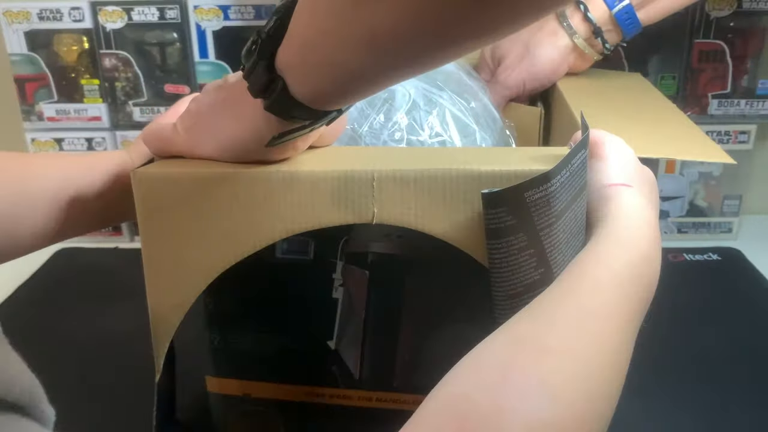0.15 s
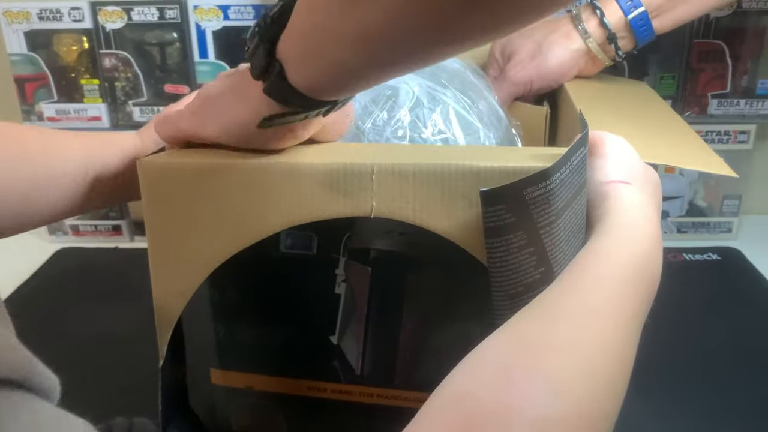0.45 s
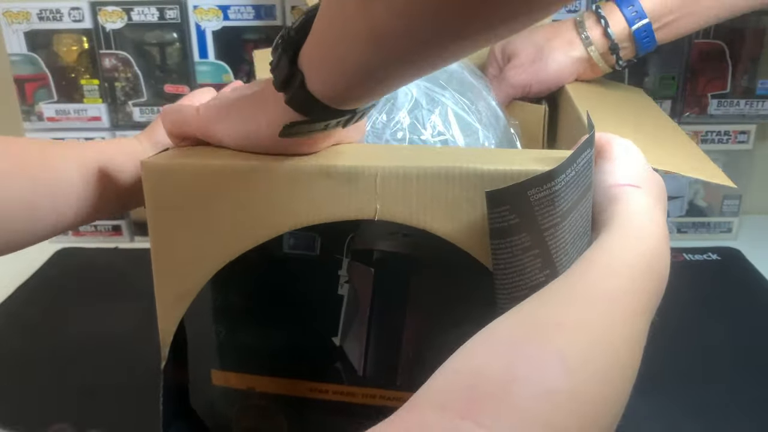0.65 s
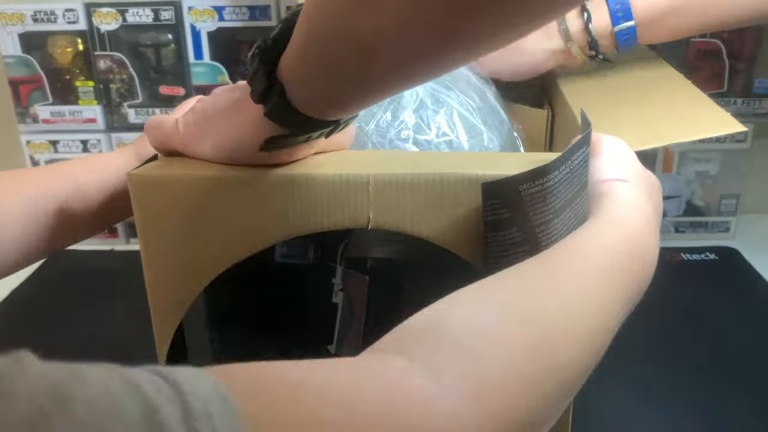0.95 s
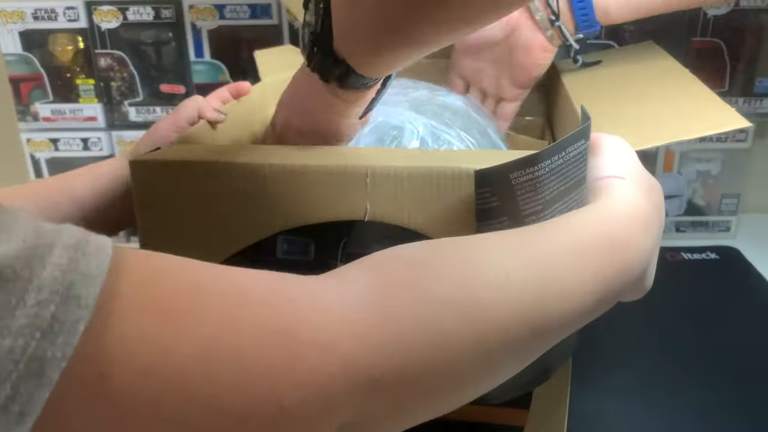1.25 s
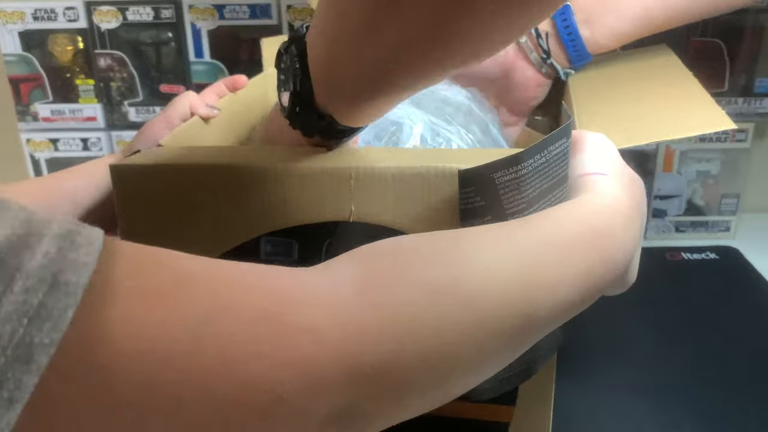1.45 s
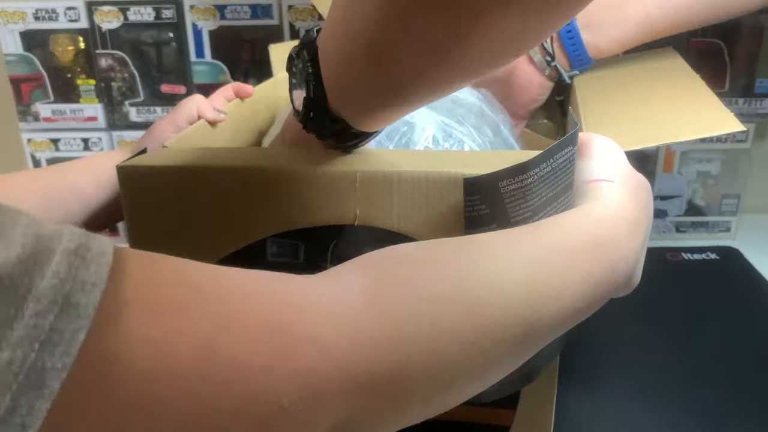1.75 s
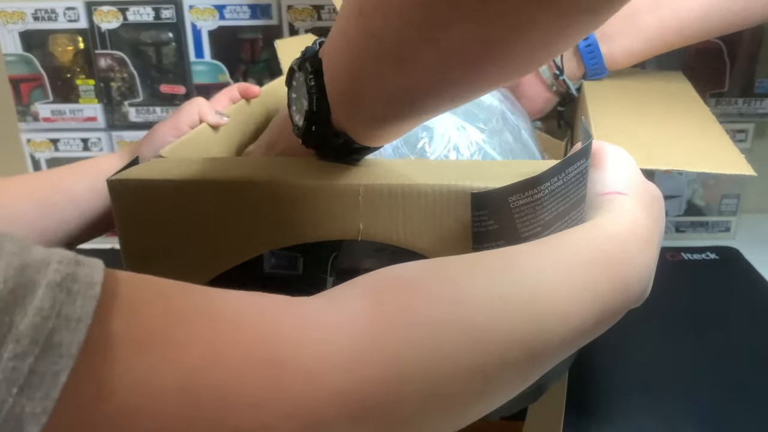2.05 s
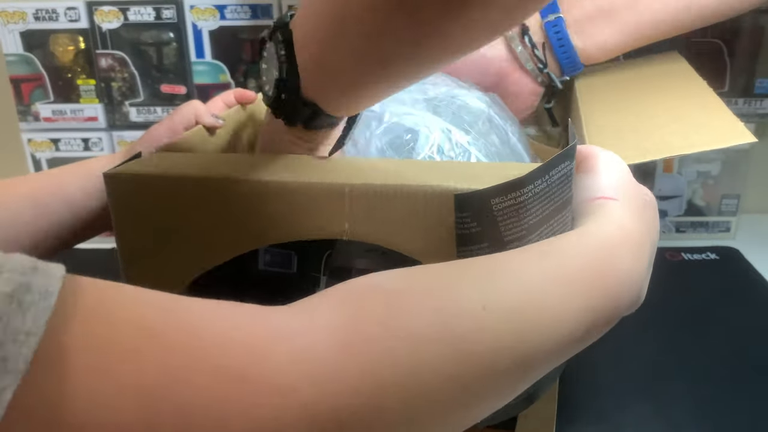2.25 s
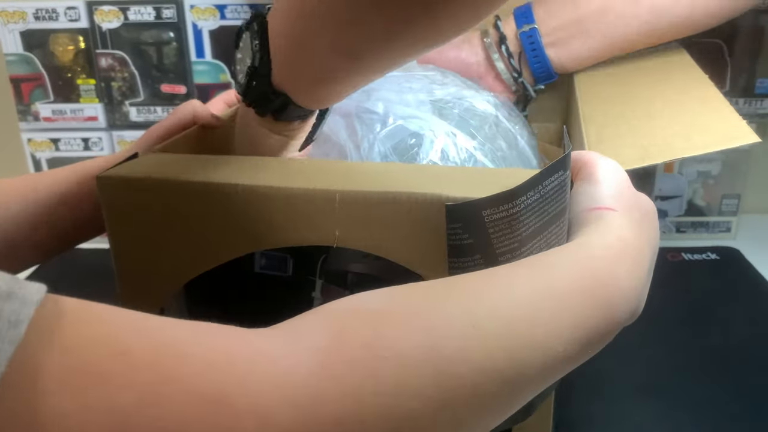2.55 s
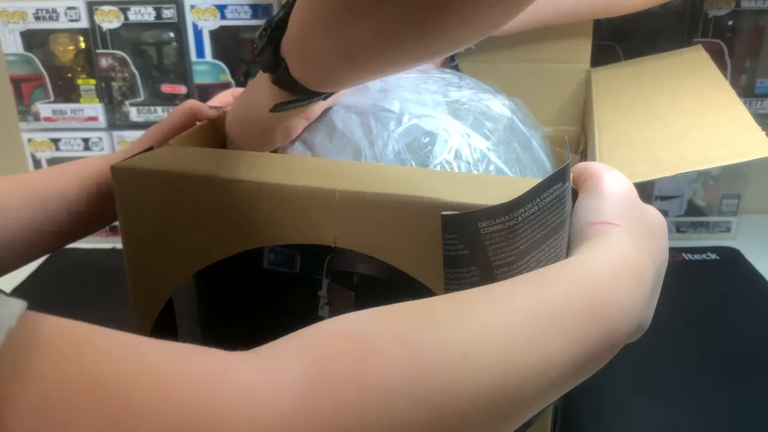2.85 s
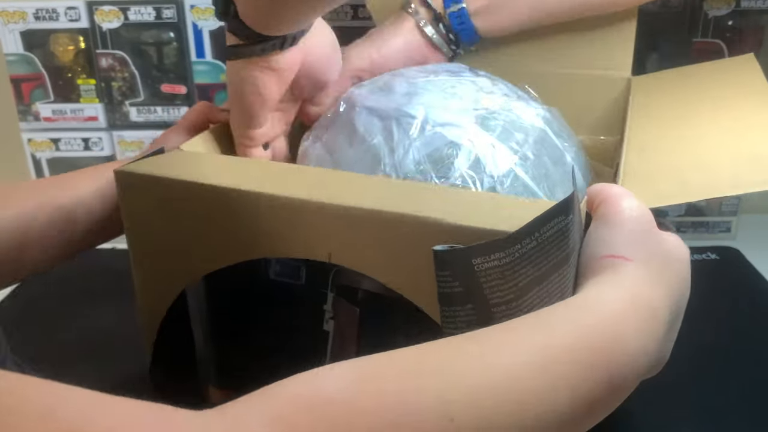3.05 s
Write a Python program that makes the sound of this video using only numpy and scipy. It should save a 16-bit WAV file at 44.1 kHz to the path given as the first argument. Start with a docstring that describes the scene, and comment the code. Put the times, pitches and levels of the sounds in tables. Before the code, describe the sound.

Cardboard box handling, close in a small, dry room. Uneven card rubbing and plastic crinkle run throughout, with a modest snap near 0.67 s and soft taps around 0.9. A hollow flap thump lands at 1.2 s, then a short scrape and tiny squeak near 1.3-1.4. Loud, distorting snaps crowd 1.56-2.11; finger taps follow, weaker snaps from 2.53, another scrape at 2.74, and crinkling to the end.

```python
"""Close to the microphone in a small room, hands work a plastic-wrapped object loose inside a cardboard box.
Card rubs and wrap crinkles throughout (random slips and creases); fingers tap and stiff card snaps.
At 1.2 s a big flap thumps (damped modes); then an edge scrapes (drifting resonance) and card squeaks (a tone).
Snaps (crack, box ring, scatter) crowd in from 1.56 to 2.11 s and return from 2.53 s, with a second scrape.
The loudest snaps overload the microphone."""
import sys
import numpy as np
from scipy import signal
from scipy.fft import rfft, irfft
from scipy.io import wavfile
from scipy.ndimage import uniform_filter1d

SR = 44100
rng = np.random.default_rng(int(sys.argv[2]) if len(sys.argv) > 2 else 0)


def to_wav(sig):
    """Store sig (one row per channel, or 1-D mono) as 16-bit WAV at the path in sys.argv[1].

    Samples outside -1..1 are clipped; the rate is SR.
    """
    pcm = np.clip(np.atleast_2d(sig), -1, 1) * 32767
    pcm = np.round(pcm).astype(np.int16)
    wavfile.write(sys.argv[1], SR, pcm.T)  # frames by channels


N = 141120
T = np.arange(N) / SR
HIT_T = T[:8192]  # time within one blow [s]

# Small room: (level in the middle [dB], level in the side [dB]), then decay times by 60 dB [s]
ROOM_DB, ROOM_SIDE_DB = -20, -23.5
ROOM_T60_S, ROOM_TREBLE_T60_S = 0.19, 0.18

# Sliding, levels before the trims below:
# (time [s], flexing wall level [dB], rubbing level [dB], crinkling level [dB])
SLIDE_LEVELS = [(0, -44, -37, -41), (0.11, -52, -44, -42), (0.21, -52, -50, -54), (0.31, -54, -52, -53),
                (0.38, -54, -47, -53), (0.43, -57, -56, -62), (0.54, -52, -42, -45), (0.63, -38, -43, -43),
                (0.70, -34, -34, -41), (0.79, -57, -46, -46), (0.95, -52, -44, -44), (1.01, -48, -33, -40),
                (1.1, -45, -39, -45), (1.15, -58, -52, -58), (1.19, -41, -37, -43), (1.33, -31, -30, -40),
                (1.41, -43, -38, -43), (1.5, -43, -36, -41), (1.655, -57, -48, -51), (1.69, -42, -35, -41),
                (1.97, -46, -44, -48), (2.18, -50, -40, -44), (2.35, -45, -38, -40), (2.55, -44, -38, -40),
                (2.66, -44, -47, -45), (2.72, -41, -31, -39), (2.78, -31, -27, -35), (2.85, -43, -37, -42),
                (2.91, -46, -39, -37), (3.08, -43, -35, -39), (3.2, -46, -36, -33)]
FLEX_TRIM_DB, RUB_TRIM_DB, WRAP_TRIM_DB = -0.5, 1, 2.5
# Spectrum of the flexing walls: (frequency [Hz], relative level [dB])
FLEX_SPECTRUM = [(100, -13), (170, -2), (280, -0.5), (450, -0.5), (700, -12), (2000, -53)]
# Spectrum of the rubbing card: (frequency [Hz], relative level [dB])
RUB_SPECTRUM = [(120, -37), (350, -13.5), (600, 2), (850, 1), (1300, -4), (1800, -0.5), (2800, -12),
                (16000, -44)]
# Spectrum of the crinkling wrap: (frequency [Hz], relative level [dB])
WRAP_SPECTRUM = [(300, -54), (1500, 1.5), (3000, 1.5), (6500, -1.5), (10000, -4), (16000, -8)]
RUB_PER_S, RUB_SPREAD_DB = 1400, 2.6
RUB_FLICKER_DB, RUB_FLICKER_HZ = 2.5, 43.8  # the sliding catches and lets go
# The moving contact drives now one mode, now another
RUB_RING_DB, RUB_SHIFT_DB, RUB_SHIFT_HZ = -11, 4.5, 18

# Sizes of crease in the wrap: (lowest frequency [Hz], highest frequency [Hz])
CREASE_BANDS = [(300, 2500), (2500, 4500), (4500, 7500), (7500, 11000), (11000, 17000)]
CRINKLE_PER_S, CRINKLE_SPREAD_DB = 380, 4.48
CRINKLE_DECAY_S, CRINKLE_BED = 0.0032, 0.17  # decay of the power; steady power underneath

# Ticks of the wrap: (time [s], decay [s], level [dB], frequency that places the band [Hz])
WRAP_TICKS = [(0.048, .003, -44, 6400), (0.228, 0.028, -42.5, 4500), (0.606, 0.004, -39.5, 7150),
              (0.9007, 0.001, -35, 1980), (1.0795, 0.00064, -26, 7900), (1.112, 0.0033, -36, 1670),
              (1.284, 0.0086, -37.5, 9000), (1.442, 0.012, -32, 6800), (1.537, 0.0013, -35, 3000),
              (1.771, 0.0025, -36, 2980), (1.993, 0.0069, -32, 1780), (2.1, 0.0095, -30, 2940),
              (2.389, 0.0049, -34.5, 1900), (2.813, 0.0021, -33.5, 5260), (3.018, 0.0038, -31.5, 6500)]
TICK_TAIL_S, TICK_TAIL_DB = 0.012, -10

# Soft taps of fingers and flaps: (time [s], level [dB], centre frequency [Hz])
SOFT_TAPS = [(0.675, -34, 258), (0.706, -39, 503), (0.843, -32.5, 647), (0.902, -32, 860),
             (0.982, -26.5, 830), (1.383, -35.5, 774), (1.431, -27.5, 1030), (1.700, -33.5, 810),
             (2.209, -31, 940), (2.261, -29, 702), (2.281, -27, 694), (2.340, -26.5, 856),
             (2.374, -34.5, 430), (2.423, -27, 785), (2.473, -34, 810), (2.687, -28.5, 900),
             (2.783, -22.5, 738), (2.814, -31.5, 980), (2.955, -29.5, 292), (2.965, -24.5, 1020),
             (3.000, -30, 930), (3.055, -31.5, 820), (3.087, -32.5, 936)]
TAP_PUSH_S, TAP_RING_DB, TAP_RISE_S = 0.0039, -1, 0.00093

# Squeak of card on the wrap, before waver and flutter: (time [s], pitch [Hz], peak level [dB])
SQUEAK_PATH = [(1.364, 2100, -41), (1.373, 1956, -19), (1.379, 1590, -26), (1.384, 1575, -15.5),
               (1.402, 1560, -41)]
SQUEAK_WAVER, SQUEAK_FLUTTER_DB = 0.0305, 4.5  # waver as a fraction of the pitch
# Spectrum of that unsteadiness: (frequency [Hz], relative level [dB])
UNSTEADY_SPECTRUM = [(250, 4), (900, -26.5)]

# Scrapes of a card edge:
# (time [s], length [s], level at the middle [dB], resonance at the start [Hz], at the end [Hz])
EDGE_SCRAPES = [(1.298, 0.059, -25, 731.6, 874), (2.735, 0.0583, -25.5, 1154, 797)]
SCRAPE_WIDTH_HZ = 60

# Modes of the big flap: (frequency [Hz], relative level [dB], decay by 60 dB [s])
FLAP_MODES = [(239, -9.5, 0.062), (318, -4, 0.046), (391, 2, 0.0316), (459, 0, 0.053), (803, -4.5, 0.053)]
THUMP_S, THUMP_DB, THUMP_PUSH_S, THUMP_SCUFF_DB = 1.2055, -12, 0.00043, -25
FLAP_LOW_HZ = 228

# Modes of the box: (frequency [Hz], relative level [dB], decay by 60 dB [s])
BOX_MODES = [(342.4, -14.5, 0.025), (467, -0.5, 0.048), (664.4, -2, 0.04), (803.6, 0, 0.07),
             (926, -3.5, 0.052), (1300, -2, 0.052), (1540, -3.5, 0.038), (1775, 8.5, 0.049),
             (2252, 6.5, 0.046), (2682, -3, 0.053), (3360, 9, 0.02), (3704, 6, 0.048), (4065, 7.5, 0.027)]

# Snaps of card, levels before the trim below: (time [s], decay of the crack [s],
# resonance favoured by the spot [Hz], bass [dB], middle [dB], presence [dB], treble [dB])
CARD_SNAPS = [(0.0535, 0.00057, 1012, -47, -26.5, -37.5, -61),
              (0.6655, 0.0006, 817, -25.5, -22.5, -18.5, -36), (1.558, 0.0019, 820, -21.5, -11.5, -10, -17),
              (1.805, 0.0031, 3460, -17.5, -12, -9.5, -16.5), (1.8472, 0.0071, 2120, -25.5, -7, -7.5, -14),
              (2.006, 0.0032, 1640, -24, -17.5, -18.5, -21), (2.0385, 0.0015, 960, -21, -13, -12.5, -20),
              (2.1062, 0.006, 1510, -27, -11, -14.5, -20), (2.5299, 0.0018, 2200, -44, -20.5, -15, -25),
              (2.544, 0.0028, 2270, -41, -23, -21.5, -23.5), (2.595, .006, 6960, -45, -28, -24.5, -21.5),
              (2.6033, 0.0009, 483, -23.5, -16.5, -16.5, -19),
              (2.7315, 0.00074, 5200, -33, -25, -20.5, -22), (2.939, 0.0023, 1930, -27.5, -22.5, -27, -27),
              (2.958, 0.0036, 1130, -34, -20.5, -27, -30.5)]
# Bass, middle, presence and treble of a snap: (lowest frequency [Hz], highest frequency [Hz])
SNAP_BANDS = [(210, 600), (600, 1500), (1500, 4600), (4000, 17000)]
# How a snap develops in those ranges, ring and scatter relative to the crack before the pump:
# (delay [s], ring level [dB], scatter level [dB], scatter decay [s])
SNAP_GROWTH = [(0.0012, 9.5, -0.5, 0.024), (0.00079, 1, 0.5, 0.012), (0.00029, 2.5, -3, 0.015),
               (0, -12, 6, 0.011)]
SNAP_TRIM_DB, SNAP_SOFT_HZ = -3.5, 7100
SNAP_LONG_S, SNAP_PUMP = 0.0042, 0.4  # a longer crack pumps more into the box
CRACK_ROUGH, CRACK_GRAIN_HZ = 0.31, 692  # the scatter of a snap is ragged
ACCENT_DB = 6.5  # resonance brought out by the spot that is touched

# Stereo width and the microphone
WIDE_HZ, WIDTH = 4550, 0.95
MIC_LOW_HZ, TOP_HZ, CEILING = 140, 15900, 1.0


def undb(db):
    """Decibels to gain."""
    return 10 ** (np.asarray(db) / 20)


def unit(x):
    """Scale to an energy of one."""
    return x / np.sqrt(np.sum(x ** 2))


def blow(x, db):
    """Set the level of a blow, taken over 30 ms."""
    return unit(x) * undb(db) * np.sqrt(.03 * SR)


def add(out, s, x):
    """Mix x in at a time."""
    i = max(int(s * SR), 0)
    out[i:i + len(x)] += x[:N - i]


def band(x, lo, hi, order=2):
    """Band-pass."""
    edges = [lo, min(hi, SR / 2 - 500)]
    return signal.sosfilt(signal.butter(order, edges, "band", fs=SR, output="sos"), x)


def convolve(x, response):
    """Play x through a response."""
    return signal.fftconvolve(x, response)[:len(x)]


def colour(x, points):
    """Filter x by a spectrum and scale it to an rms of one."""
    hz, db = np.array(points).T
    f = np.maximum(np.fft.rfftfreq(N, 1 / SR), 1)
    gain = undb(np.interp(np.log(f), np.log(hz), db))
    y = irfft(rfft(x) * gain, N)
    return y / y.std()


def wander(hz):
    """A random drift with a spread of one."""
    x = band(rng.standard_normal(N), hz / 4, hz)
    return x / x.std()


def grains(per_s, spread_db):
    """Random slips: many small, a few large."""
    happens = rng.random(N) < per_s / SR
    size = undb(spread_db * np.minimum(rng.exponential(size=N), 5))
    return happens * size * rng.choice([-1, 1], N)


def burst(decay_s):
    """A dying burst of tiny fibre clicks."""
    return unit(rng.standard_normal(len(HIT_T)) * np.exp(-HIT_T / decay_s))


def ring(modes, jitter=0.):
    """Damped modes with a random overall polarity; jitter detunes each mode at random on every call."""
    total = np.zeros(len(HIT_T))
    for k, (hz, db, t60) in enumerate(modes):
        detuned_hz = hz * (1 + jitter * rng.standard_normal())
        decay = undb(db - 60 * HIT_T / t60)
        total += (-1) ** k * decay * np.sin(2 * np.pi * detuned_hz * HIT_T)
    return rng.choice([-1, 1]) * unit(total)


def favour(x, hz):
    """The spot that is touched brings out one resonance."""
    return x + undb(ACCENT_DB) * band(x, hz / 1.07, hz * 1.07, order=1)


def room():
    """Response of the small room; the treble dies sooner."""
    noise = rng.standard_normal(N)
    low_tail = band(noise, 130, 2500) * undb(-60 * T / ROOM_T60_S)
    treble_tail = band(noise, 2500, 16000) * undb(-60 * T / ROOM_TREBLE_T60_S)
    return unit((low_tail + treble_tail) * np.clip(T / 0.0016, 0, 1))


def crinkle():
    """Creases of five sizes, each size crackling on its own."""
    out = np.zeros(N)
    for lo, hi in CREASE_BANDS:
        crackles = grains(CRINKLE_PER_S, CRINKLE_SPREAD_DB) ** 2
        power = convolve(crackles, np.exp(-HIT_T / CRINKLE_DECAY_S))
        out += band(rng.standard_normal(N) * np.sqrt(np.abs(power) + CRINKLE_BED), lo, hi)
    return out


def sliding():
    """Card sticks and slips, shaking the walls and ringing the box's lower modes in turn; the wrap crinkles."""
    s, flex_db, rub_db, wrap_db = np.array(SLIDE_LEVELS).T
    slips = grains(RUB_PER_S, RUB_SPREAD_DB) * undb(RUB_FLICKER_DB * wander(RUB_FLICKER_HZ))
    walls = np.zeros(N)
    for mode in BOX_MODES[:7]:  # ring() gives each single mode the same energy
        drive = slips * undb(RUB_SHIFT_DB * wander(RUB_SHIFT_HZ))
        walls += convolve(drive, ring([mode]))
    card = unit(slips) + undb(RUB_RING_DB) * unit(walls)
    layers = [(card, FLEX_SPECTRUM, flex_db + FLEX_TRIM_DB),
              (card, RUB_SPECTRUM, rub_db + RUB_TRIM_DB),
              (crinkle(), WRAP_SPECTRUM, wrap_db + WRAP_TRIM_DB)]
    return sum(colour(x, spectrum) * undb(np.interp(T, s, db)) for x, spectrum, db in layers)


def ticks():
    """A crease in the wrap flips over, sharply or with a short scrunch."""
    out = np.zeros(N)
    for s, length, db, hz in WRAP_TICKS:
        flip = burst(length) + undb(TICK_TAIL_DB) * burst(TICK_TAIL_S)
        add(out, s, blow(band(flip, hz * 0.22, hz * 1.3), db))
    return out


def taps():
    """Soft contacts ring only part of the box's range."""
    out = np.zeros(N)
    for s, db, hz in SOFT_TAPS:
        push = unit(band(burst(TAP_PUSH_S), hz * .5, hz * 2))
        box = unit(band(ring(BOX_MODES, jitter=0.0422), hz * 0.67, hz * 1.325))
        hit = favour(push + undb(TAP_RING_DB) * box, hz)
        add(out, s, blow(hit * np.minimum(HIT_T / TAP_RISE_S, 1), db))
    return out


def squeak():
    """A short, unsteady stick-slip tone that sags as the slide slows."""
    s, hz, db = np.array(SQUEAK_PATH).T
    waver, flutter = (colour(rng.standard_normal(N), UNSTEADY_SPECTRUM) for _ in range(2))
    pitch = np.interp(T, s, hz) * (1 + SQUEAK_WAVER * waver)
    phase = 2 * np.pi * np.cumsum(pitch) / SR
    level_db = np.interp(T, s, db, left=-120, right=-120) + SQUEAK_FLUTTER_DB * flutter
    return undb(level_db) * np.sin(phase)


def scrapes():
    """An edge drags along a wall; the wall's resonance moves with the point of contact."""
    out = np.zeros(N)
    for s, length, db, first_hz, last_hz in EDGE_SCRAPES:
        along = np.clip((T - s) / length, 0, 1)
        phase = 2 * np.pi * np.cumsum(first_hz + (last_hz - first_hz) * along) / SR
        # two independent drifts spread the tone into a narrow band of noise
        judder = wander(SCRAPE_WIDTH_HZ) * np.sin(phase) + wander(SCRAPE_WIDTH_HZ) * np.cos(phase)
        out += undb(db) * np.sin(np.pi * along) * judder
    return out


def thump():
    """The big flap scuffs past an edge and drops against the box; it is too small to radiate deep bass."""
    out = np.zeros(N)
    knock = convolve(ring(FLAP_MODES), np.exp(-HIT_T / THUMP_PUSH_S))
    add(out, THUMP_S, blow(band(knock, FLAP_LOW_HZ, SR / 4), THUMP_DB))
    scuff = band(burst(0.011), 630, 1730, order=1)
    add(out, THUMP_S - .003, blow(scuff, THUMP_SCUFF_DB))
    return out


def ragged():
    """Noise that comes in uneven clumps, as fibres tear one after another."""
    clumps = uniform_filter1d(rng.standard_normal(len(HIT_T)), int(SR / CRACK_GRAIN_HZ))
    return rng.standard_normal(len(HIT_T)) * np.exp(CRACK_ROUGH * clumps / clumps.std())


def snaps():
    """Card gives way with a crack, which rings the box and scatters between its walls; the lows come late."""
    out = np.zeros(N)
    for s, length, hz, *levels in CARD_SNAPS:
        crack, modes, scatter = burst(length), ring(BOX_MODES, jitter=0.012), ragged()
        pump = (length / SNAP_LONG_S) ** SNAP_PUMP
        for edges, growth, db in zip(SNAP_BANDS, SNAP_GROWTH, levels):
            late, ring_db, scatter_db, decay = growth
            parts = [(crack, 1),
                     (modes, pump * undb(ring_db)),
                     (scatter * np.exp(-HIT_T / decay), pump * undb(scatter_db))]
            hit = sum(gain * unit(band(x, *edges, order=3)) for x, gain in parts)
            soft = band(favour(hit, hz), 120, SNAP_SOFT_HZ, order=1)
            add(out, s + late, blow(soft, db + SNAP_TRIM_DB))
    return out


def scene():
    """The box is straight ahead; its treble reaches the two channels by different paths."""
    dry = sliding() + ticks() + taps() + squeak() + scrapes() + thump() + snaps()
    mid = dry + undb(ROOM_DB) * convolve(dry, room())
    # the same events with fresh random detail
    other_paths = sliding() + ticks() + taps() + snaps()
    wide_treble = WIDTH * band(other_paths, WIDE_HZ, SR / 2, order=1)
    side = wide_treble + undb(ROOM_SIDE_DB) * convolve(dry, room())
    return np.array([mid + side, mid - side])


def record(dry):
    """The microphone drops the deep bass, the loudest snaps clip, the top is cut."""
    thin = signal.sosfilt(signal.butter(3, MIC_LOW_HZ, "high", fs=SR, output="sos"), dry)
    clipped = np.clip(thin, -CEILING, CEILING)
    return signal.sosfilt(signal.ellip(10, .2, 60, TOP_HZ, fs=SR, output="sos"), clipped)


dry = scene()
out = record(dry)
to_wav(out)
```